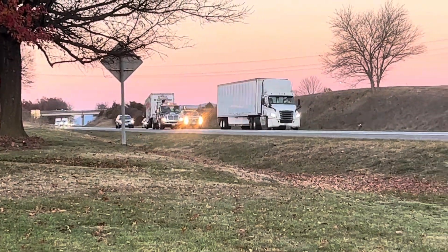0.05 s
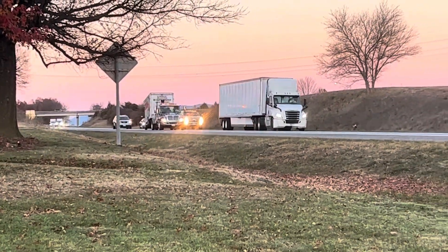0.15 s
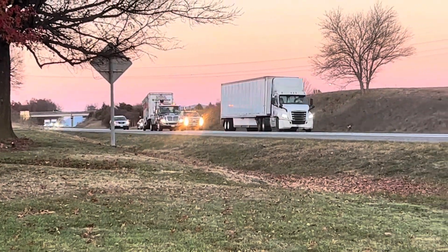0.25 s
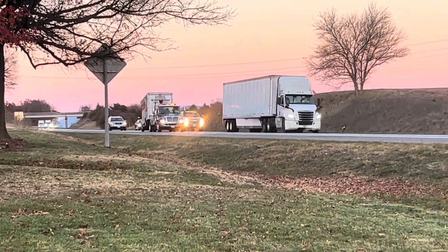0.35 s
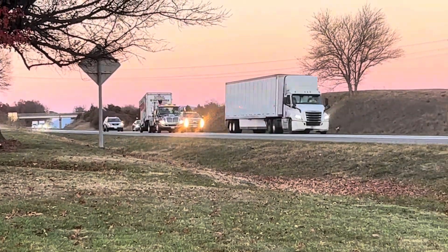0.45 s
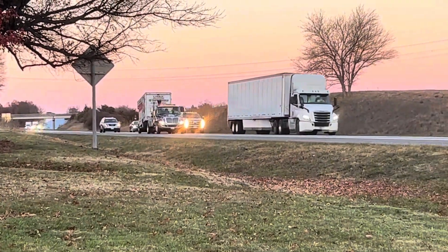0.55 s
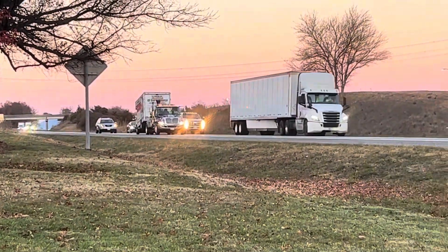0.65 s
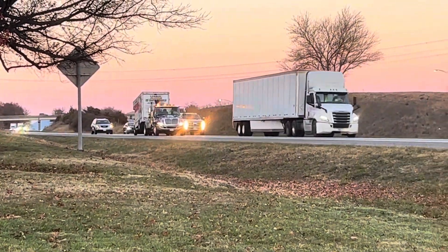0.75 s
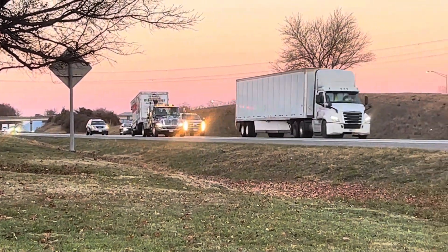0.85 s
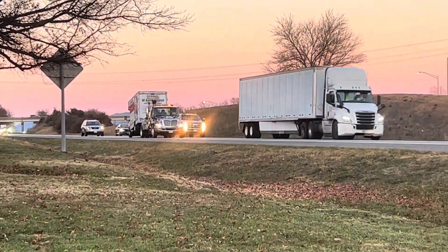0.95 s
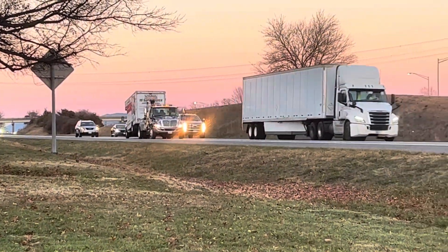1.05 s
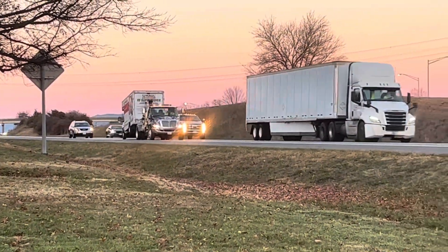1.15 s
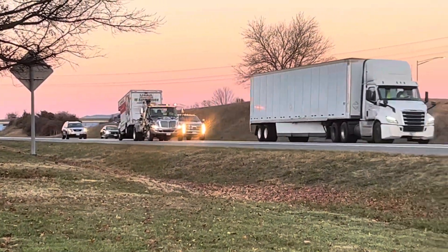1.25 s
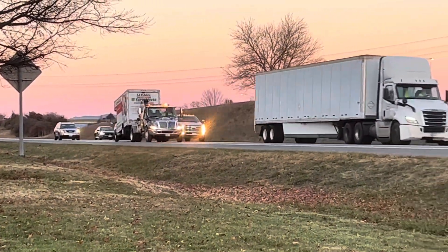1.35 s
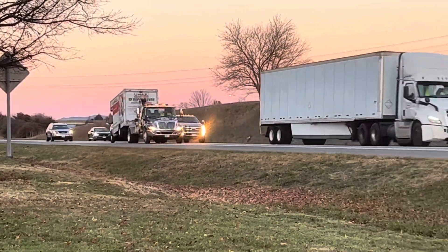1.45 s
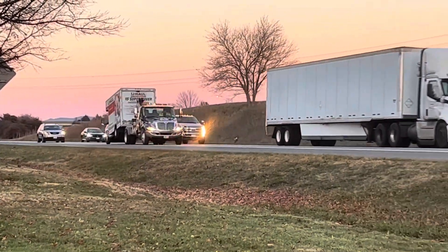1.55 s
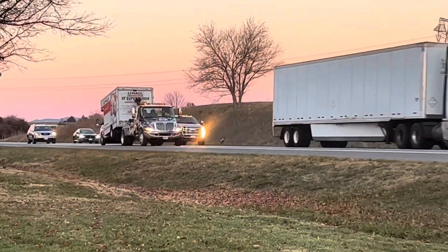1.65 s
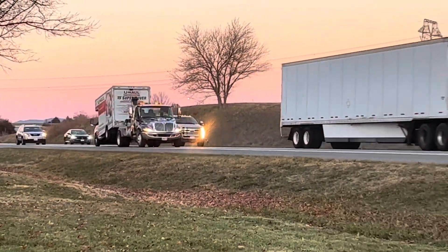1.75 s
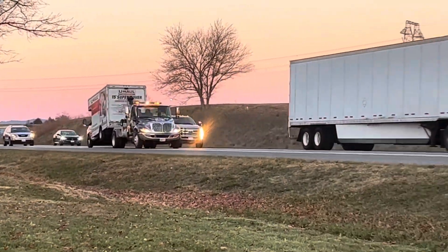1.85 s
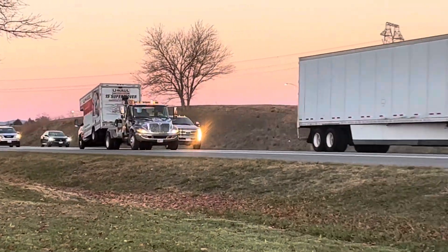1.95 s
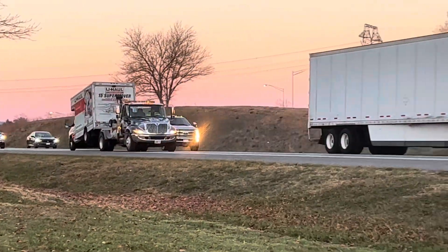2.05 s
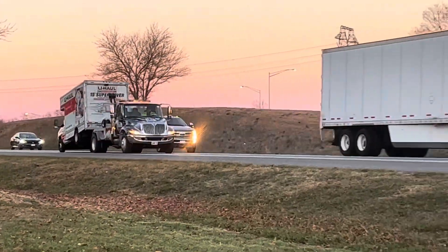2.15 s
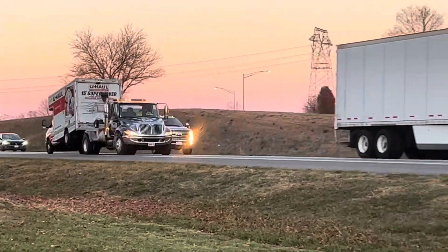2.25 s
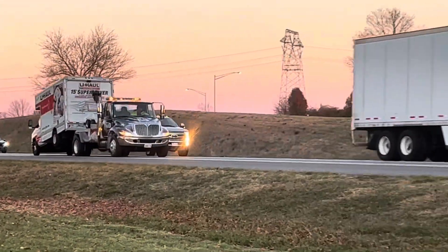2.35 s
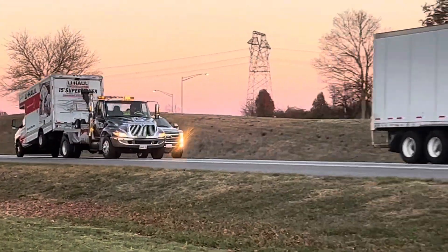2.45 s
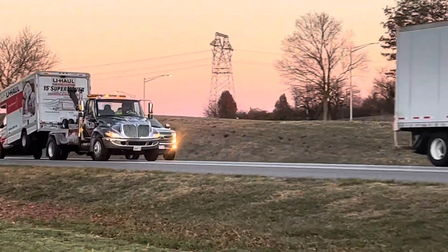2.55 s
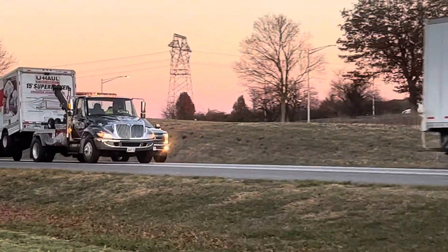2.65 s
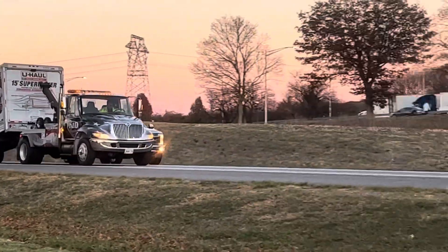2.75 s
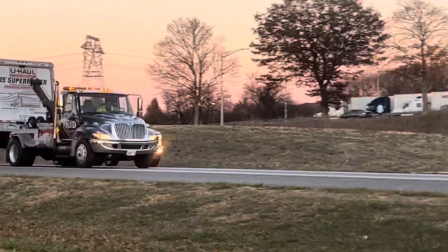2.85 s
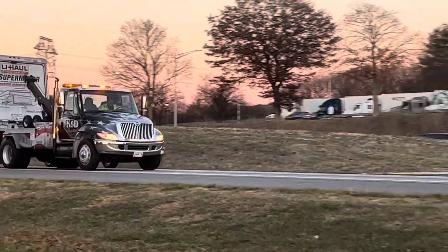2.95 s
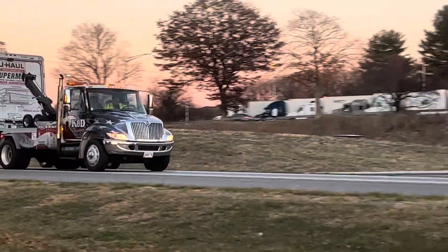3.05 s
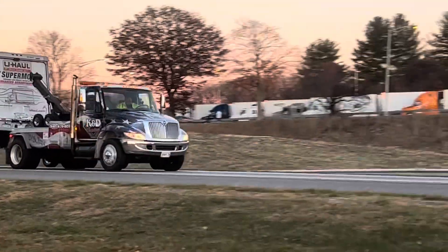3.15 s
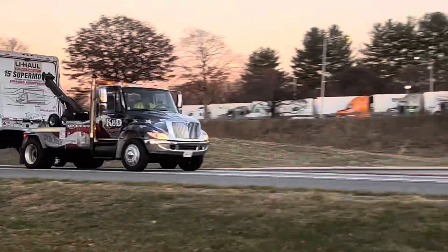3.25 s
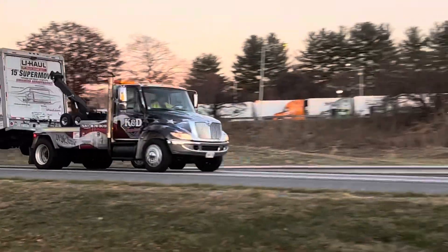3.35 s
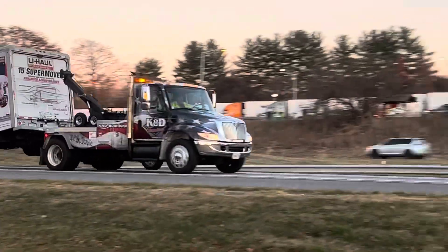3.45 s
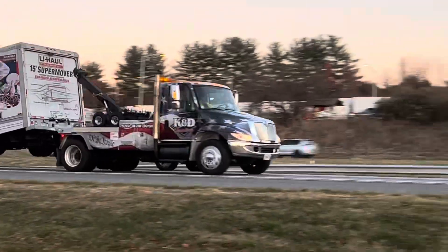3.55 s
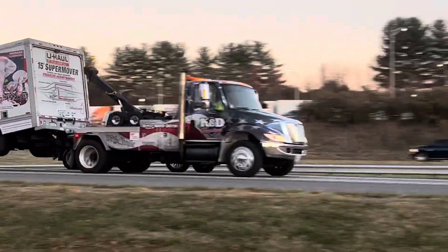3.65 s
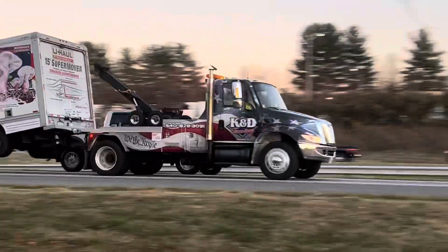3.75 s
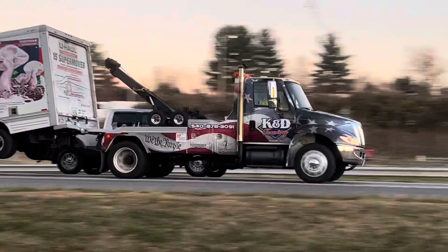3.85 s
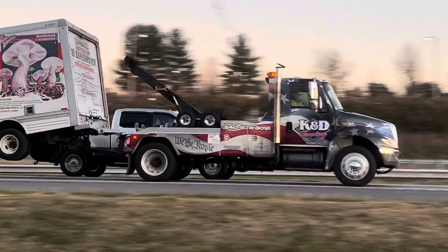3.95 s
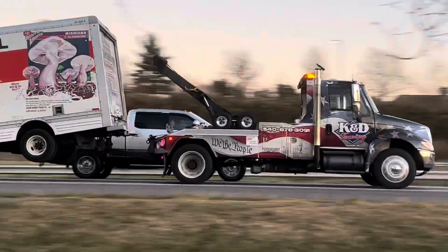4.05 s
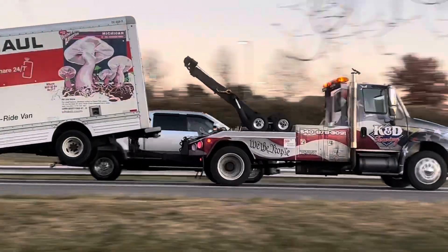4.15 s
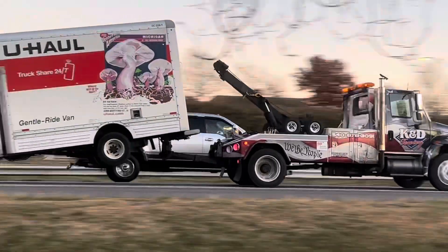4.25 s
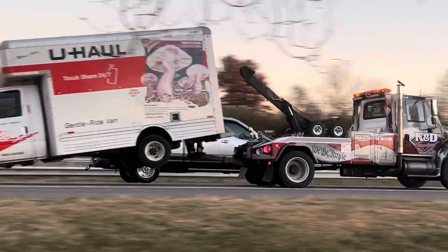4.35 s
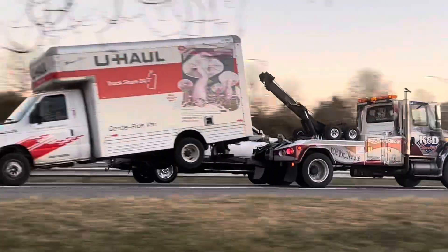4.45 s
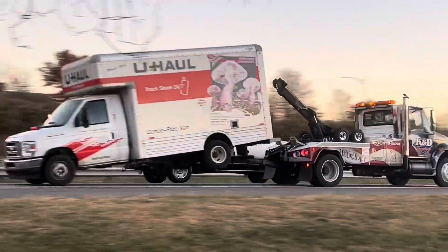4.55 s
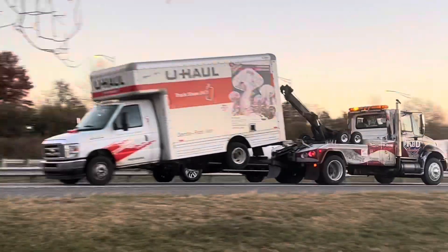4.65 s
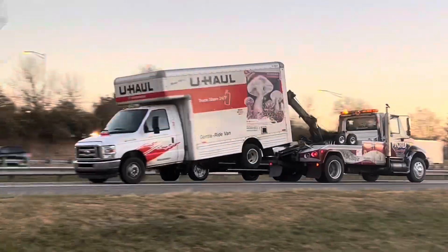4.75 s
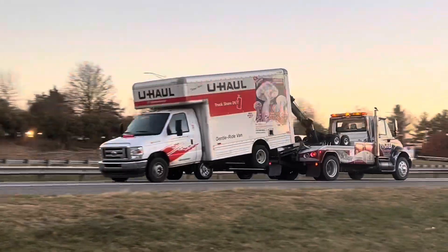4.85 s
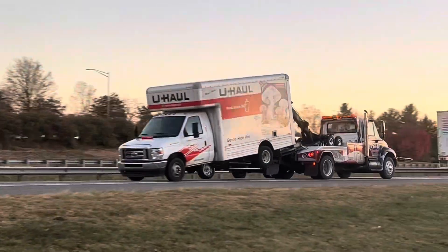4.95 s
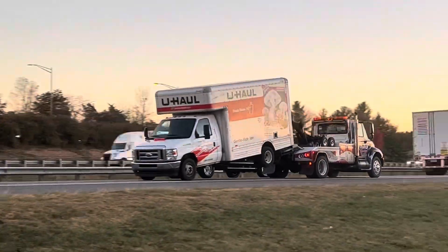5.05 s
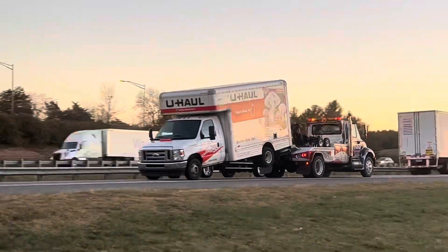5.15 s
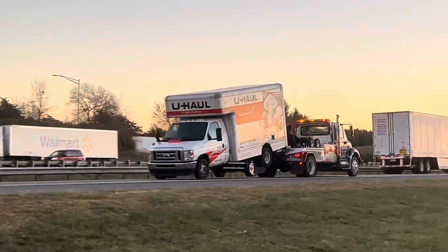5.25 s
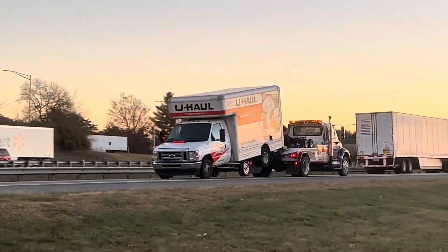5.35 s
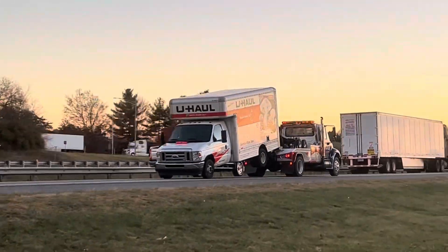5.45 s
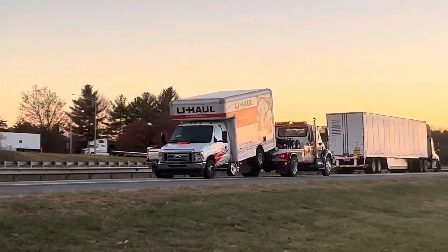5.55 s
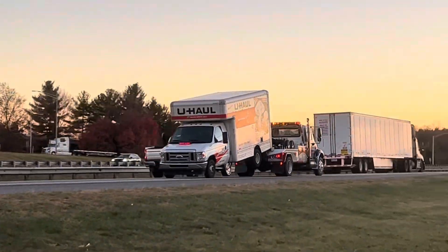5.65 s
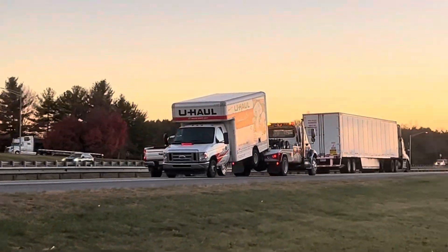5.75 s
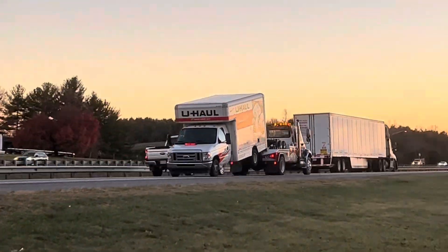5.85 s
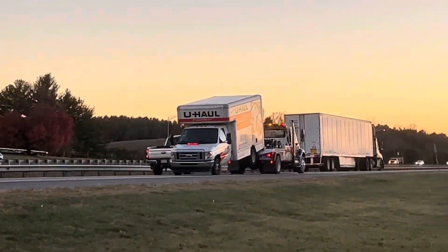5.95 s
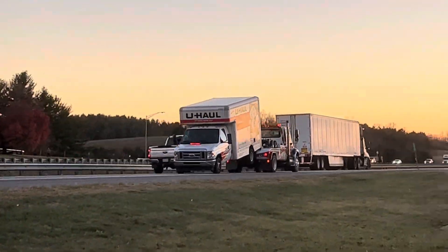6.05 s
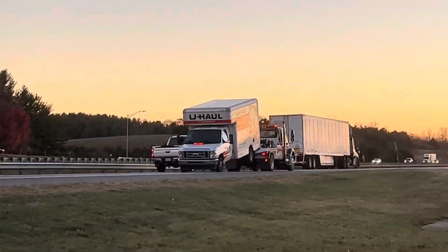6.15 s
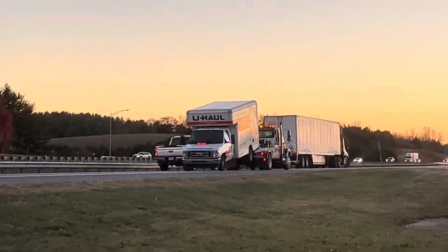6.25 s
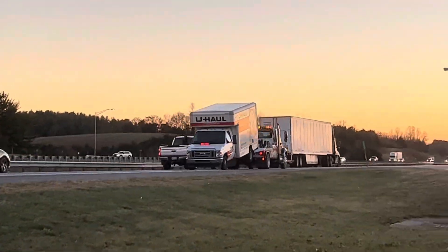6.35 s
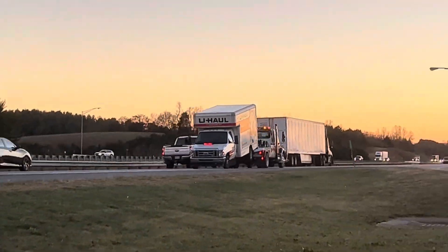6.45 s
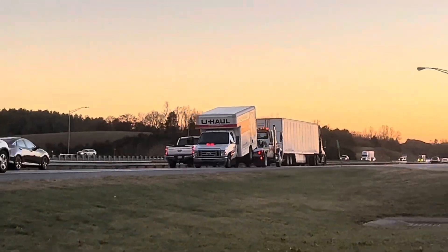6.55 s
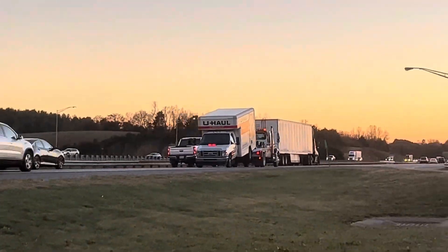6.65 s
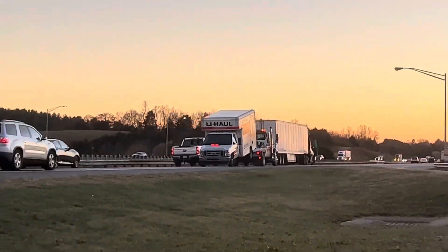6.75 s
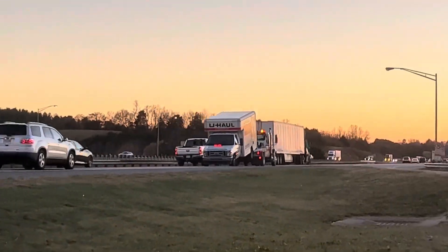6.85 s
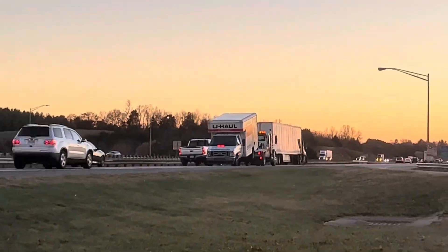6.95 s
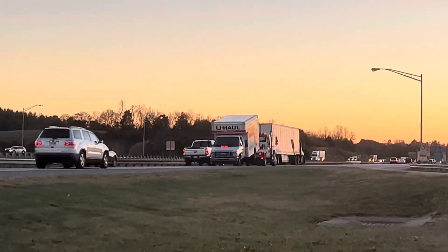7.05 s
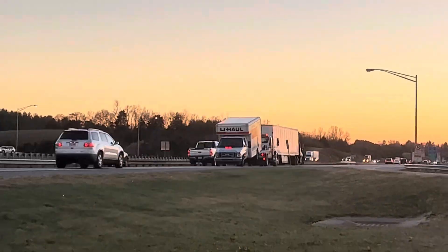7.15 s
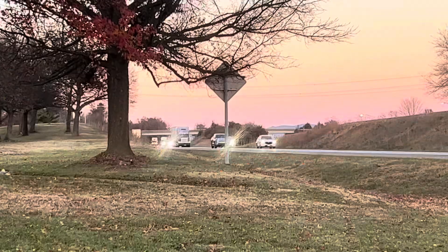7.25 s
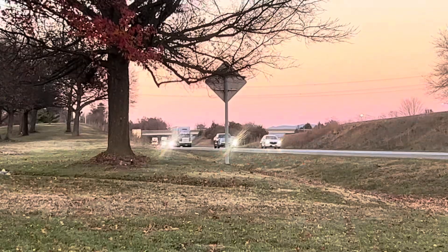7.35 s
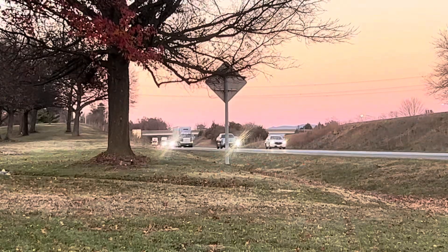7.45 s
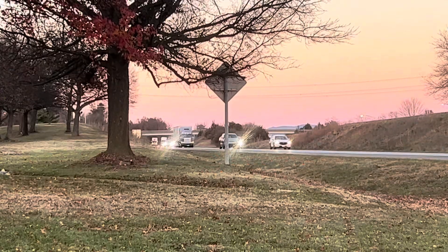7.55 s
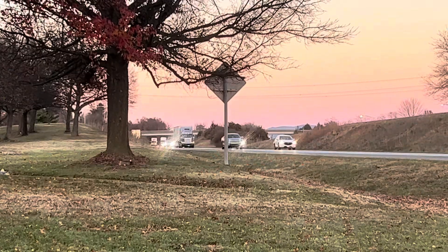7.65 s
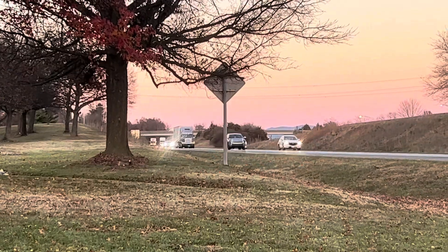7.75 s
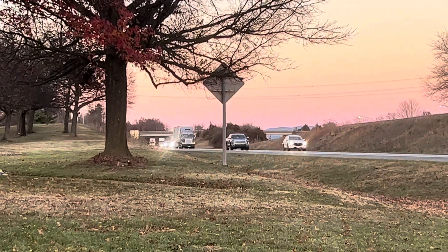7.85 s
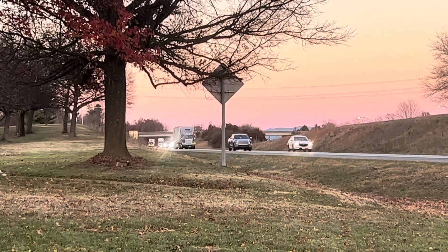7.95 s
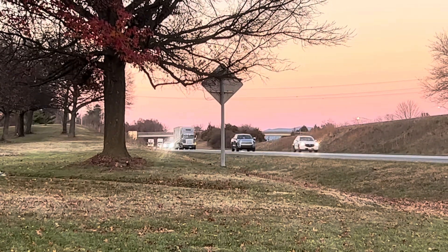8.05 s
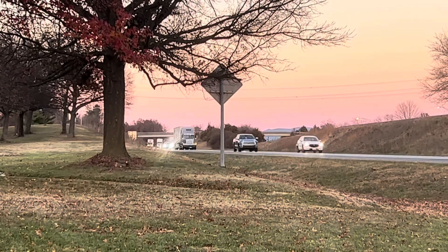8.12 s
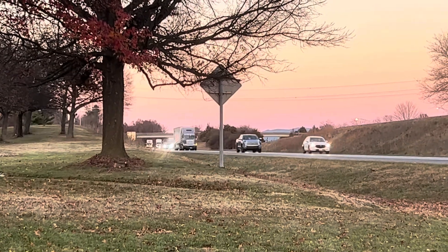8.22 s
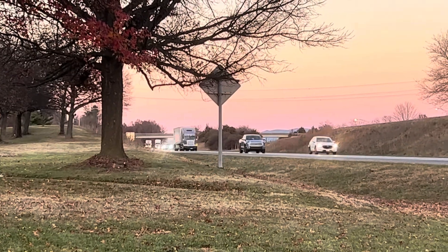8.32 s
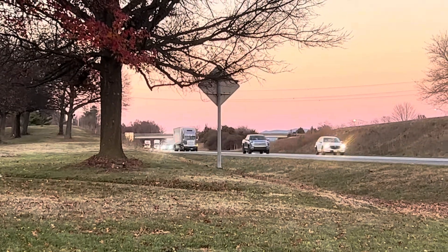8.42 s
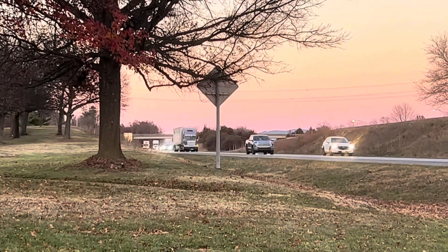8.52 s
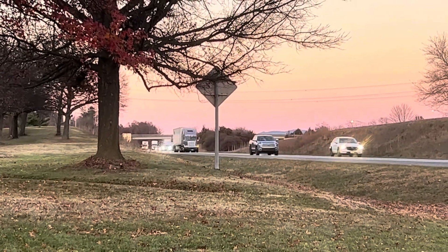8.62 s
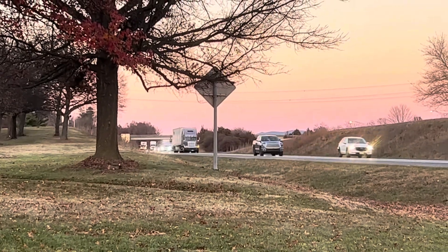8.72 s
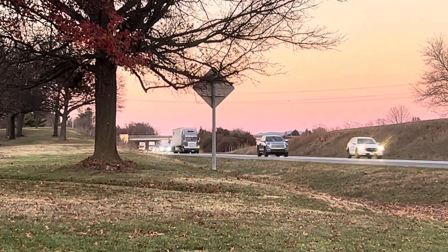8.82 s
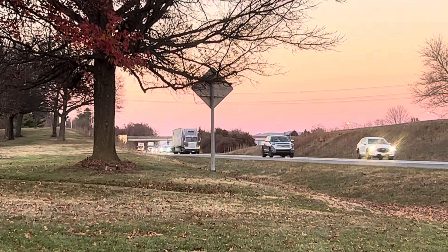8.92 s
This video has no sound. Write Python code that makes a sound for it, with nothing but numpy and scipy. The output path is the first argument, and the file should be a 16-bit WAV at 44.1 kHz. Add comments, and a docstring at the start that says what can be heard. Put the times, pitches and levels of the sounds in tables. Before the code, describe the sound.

Outdoors beside a highway, a stereo microphone on the grass verge catches a large truck approaching and roaring past, its singing tyres and diesel note gliding down. A tow truck pulling a van follows about a second later, with pulsing tyre hum, rushing air, hiss and low engine boom. The noise recedes as a smaller car passes, then cuts abruptly to a far quieter murmur of distant traffic with soft approaching tyre hum.

```python
"""A tractor-trailer passes a grass verge beside a highway, then a tow truck hauling a box van, then cars.
Filtered noise makes the rumble of the bodies and the roar, rush and hiss of the tyres.
Wavering tones make singing tyres, droning diesels and turbo whistles, gliding down as each truck goes by.
At 7.244 s the scene cuts to a lull in which the next cars are still far off."""
import sys
import numpy as np
from scipy.fft import rfft, irfft, next_fast_len
from scipy.io import wavfile
from scipy.ndimage import uniform_filter1d, map_coordinates

SR = 44100
rng = np.random.default_rng(int(sys.argv[2]) if len(sys.argv) > 2 else 0)


def digitize_waveform(pressure):
    """Quantize a signal to 16-bit integers and store it at the path in sys.argv[1].

    Rows of a 2-D input are taken as channels; values are limited to [-1, 1].
    """
    field = np.atleast_2d(pressure).T
    bounded = np.clip(field, -1, 1)
    quanta = np.round(bounded * 32767).astype(np.int16)
    wavfile.write(sys.argv[1], SR, quanta)


N = 396018
TIME = np.arange(N) / SR   # seconds
BIN_HZ = np.maximum(np.arange(N // 2 + 1) * SR / N, 1)   # frequency of each spectrum bin

CUT_S = 7.244   # when the lull takes over
SOUND_SPEED = 343   # m/s
LANE_SPEED = 30.5   # m/s, for the noise of all vehicles
REFERENCE_M = 20   # distance at which the noise levels are given
SCREENING_S = 2.4   # time for following vehicles to hide a truck
SKIRT = 1.8   # steepness of the flanks of every swell
WAVER, WAVER_RATE_HZ = 0.002966, 5.85   # typical share of pitch by which tones wander, and how fast
HISS_SURGE_SHARE = 0.71   # how much of the tyre surges the hiss follows
DRONE_DB, DRONE_HZ = -47.5, 60.4   # far diesels
FAR_ROAR_DB, FAR_PAN_DB = -37, -0.8   # far traffic; the pan is left minus right, below the treble
FAR_HISS_DB, FAR_TILT_DB = -57.5, -2   # steady hiss, and its change per octave
FAR_RUSH_DB = 7.5   # the far cars' rush, relative to their swell
CUTOFF_HZ = 15150   # top of the treble

# Rumble of exhausts and trailer panels. Each row: frequency in Hz, relative level in dB per Hz.
RUMBLE_COLOUR = [(18, -27), (30, -16), (45, -1.5), (62, 3), (85, -2), (110, -2.5), (140, -7), (220, -26)]
# Air torn up behind the trucks. Each row: frequency in Hz, relative level in dB per Hz.
WAKE_COLOUR = [(90, -12), (150, -3.5), (220, 0), (290, -3), (420, -0.5), (520, -6.5), (640, -6.5),
               (900, -24)]
# Tread blocks slapping the asphalt. Each row: frequency in Hz, relative level in dB per Hz.
TREAD_COLOUR = [(330, -25.5), (500, -12), (640, -4.5), (800, -1), (930, -0.5), (1080, -7.5), (1400, -19.5)]
# Air pumped out of the tread grooves. Each row: frequency in Hz, relative level in dB per Hz.
RUSH_COLOUR = [(700, -10.5), (1080, -2), (1350, 3), (1560, -2), (1720, 2), (1900, 1), (2150, -6),
               (2600, -22), (3800, -44)]
# Rubber peeling off the asphalt. Each row: frequency in Hz, relative level in dB per Hz.
HISS_COLOUR = [(1500, -7.5), (2300, 2.5), (3000, -1.5), (4300, -10), (5300, -12.5), (5900, -15.5),
               (6600, -15.5), (7300, -19), (8400, -20.5), (9300, -24), (10500, -18), (13000, -22),
               (15500, -25)]
# Far traffic, its low midrange soaked up by the grass. Each row: frequency in Hz, relative level in dB per Hz.
FAR_ROAR_COLOUR = [(25, -16), (60, -0.5), (110, -4.5), (170, -9), (280, -13.5), (450, -13), (640, -11),
                   (880, -7), (1200, -11), (1400, -12), (1560, -14.5), (1800, -11), (2100, -18.5),
                   (2800, -35)]
# Stereo width before each noise's own offset. Each row: frequency in Hz, side minus mid in dB.
STEREO_WIDTH = [(30, -34), (120, -23), (300, -12.5), (500, -10), (800, -7), (1150, -5.5), (1400, -6),
                (1560, -2), (1750, -12.5), (2200, -18), (2850, -26), (3400, -47), (5000, -43)]
# Unequal colour of left and right. Each row: frequency in Hz, left minus right in dB.
LEFT_RIGHT_BALANCE = [(200, 0), (400, -0.5), (690, 1.5), (1280, -1.5), (2360, -1.8), (3300, 0)]
# Phase of left behind right, by frequency. Each row: frequency in Hz, lag in cycles.
LEFT_LAG = [(350, 0), (540, .11), (720, .03), (950, -.04), (1150, .1), (1400, .04), (1750, -.06),
            (2200, -.01), (7450, 0), (7700, .11), (8900, .3), (9300, .45), (10300, .53), (11700, .81),
            (12100, .99), (13450, 1), (13800, 1.13), (15200, 1.44)]

# Path of the semi. In order: time abreast in seconds, speed in m/s, distance in m.
SEMI_PATH = (3.06, 31.4, 21.4)
# Path of its drive axles. In order: time abreast in seconds, speed in m/s, distance in m.
DRIVE_AXLE_PATH = (2.95, 33, 17)
# Path of the tow truck's tyres. In order: time abreast in seconds, speed in m/s, distance in m.
TOW_PATH = (4.08, 29.5, 20.5)
# Glide of the tow truck's turbo whistle. In order: time abreast in seconds, speed in m/s, distance in m.
TOW_TURBO_GLIDE = (4.09, 26.5, 13.9)
# Glide of the tow truck's diesel note. In order: time abreast in seconds, speed in m/s, distance in m.
TOW_DIESEL_GLIDE = (3.5, 29.5, 20.5)
# Semi, tow truck, a car, and one still approaching at the cut. Each row: time the front is abreast
# in seconds, distance in m, then relative levels of body, tyres and top hiss in dB.
VEHICLES = [(2.58, 29.8, 0, 0, -2), (3.76, 18.4, -8.5, -4, -3.5), (5.4, 22.7, -19, -11.5, -14.5),
            (8.12, 19, -7.5, -2.5, -11)]

# How each noise carries, before its small fixed trim and drift. In order: level at the reference
# distance in dB, loss per doubling of distance in dB, extra to the rear (taken off ahead) in dB,
# far traffic in dB. These columns serve the rumble, wake, tread and rush.
RUMBLE_LAW = (-23, 5.5, -0.5, -35)
WAKE_LAW = (-22, 10.5, 7, -50.5)
TREAD_LAW = (-22, 6, 5, -42.5)
RUSH_LAW = (-26, 6, 3, -36.5)
# The same for hiss around 3.2, 6.4 and 12.8 kHz. Each row: level in dB, loss per doubling of distance
# in dB, extra to the rear in dB, far traffic in dB.
HISS_LAWS = [(-32, 8.5, 5.5, -67), (-30.5, 11, 7, -72), (-30.5, 14.5, 8, -74)]
# Centre of the tread roar, smoothed later. Each row: time in seconds, pitch in Hz.
TREAD_PITCH = [(0, 901.5), (1.8, 751.4), (2.4, 797), (3.4, 800.6), (4.5, 735.7), (5.8, 838.7), (7.24, 890)]
# The tyre noise shifts between left and right. Each row: time in seconds, left minus right in dB.
TYRE_PAN = [(0, -4), (1.9, 0.1), (4.2, 1), (4.9, -1.5), (5.9, 1.1)]
# Tyre rush and hiss dip and surge. Each row: time in seconds, change in dB, half width in seconds.
TYRE_SURGES = [(.93, 2.5, 0.057), (1.68, -2, 0.17), (1.93, 2, 0.055), (2.28, 1.5, 0.12), (2.75, 0.8, 0.14),
               (3.58, 1.6, 0.18), (4.14, -1.9, 0.17), (4.85, 1.3, .17), (5.55, -1.5, .2), (6.1, 0.5, .15)]
# Wake gusts behind the trailer, then eases. Each row: time in seconds, change in dB, half width in seconds.
WAKE_SURGES = [(3.25, 2, 0.32), (3.88, -1.5, .12)]
# Rumble sags and wells up. Each row: time in seconds, change in dB, half width in seconds.
RUMBLE_SURGES = [(.4, -3, 0.054), (1.3, -4, 0.27), (1.88, 0.5, 0.065), (2.12, -1.5, .12), (5.4, -2, .5),
                 (6.5, -0.5, 0.12), (6.78, -3.5, .08)]
# Tread roar does so too. Each row: time in seconds, change in dB, half width in seconds.
TREAD_SURGES = [(2.3, 2, 0.089), (3.08, -3.5, 0.075), (3.45, 0, .06), (4.4, -2, 0.15), (4.74, -1.5, 0.13),
                (5.02, 0.5, 0.046)]

# Semi's tyres beam ahead and behind. Each row: loudest time in seconds, level in dB, half width in seconds.
SEMI_WHINE = [(1.7, -36.5, 0.5), (2.22, -24, 0.18), (2.72, -21, 0.19), (3.05, -31.5, 0.15),
              (3.7, -34, 0.27), (4.25, -31.5, 0.66), (5.2, -40.5, 0.6), (7.05, -41.5, 0.41)]
# Howl of its drive axles. Each row: loudest time in seconds, level in dB, half width in seconds.
SEMI_DRIVE_TYRES = [(1.55, -37, .15), (1.9, -31, .16), (2.6, -36, .25), (3.08, -27, .14), (3.36, -27, .13),
                    (3.9, -35.5, .17), (5.3, -43, .5)]
# Second axle, a little lower. Each row: loudest time in seconds, level in dB, half width in seconds.
SEMI_SECOND_AXLE = [(.35, -44.5, 0.58), (1.2, -40, 0.39), (2.2, -39, 0.71)]
# Its ringing tread grooves. Each row: loudest time in seconds, level in dB, half width in seconds.
SEMI_GROOVES = [(2.9, -30, 1.38)]
# Its diesel's firing note. Each row: loudest time in seconds, level in dB, half width in seconds.
SEMI_DIESEL = [(1.35, -36, 0.64), (2.72, -29, 0.13), (3.1, -31, 0.11), (3.55, -29.5, .25),
               (4.45, -37, 0.43)]
# Its exhaust note. Each row: loudest time in seconds, level in dB, half width in seconds.
SEMI_EXHAUST = [(1.4, -40, 0.54), (2.85, -30.5, .35), (3.5, -30.5, 0.27)]
# Its turbo. Each row: loudest time in seconds, level in dB, half width in seconds.
SEMI_TURBO = [(1.3, -65, 0.45), (2.0, -59.5, .35), (2.56, -54.5, .2)]
# Tow truck's tyre hum. Each row: loudest time in seconds, level in dB, half width in seconds.
TOW_WHINE = [(3.15, -40, 0.11), (3.39, -25.5, 0.087), (3.74, -22.5, 0.076), (4.09, -25.5, 0.08),
             (4.42, -22.5, 0.16), (4.64, -25, 0.09), (5.15, -37.5, 0.44), (6.1, -41, 0.51)]
# Second axle, a little lower. Each row: loudest time in seconds, level in dB, half width in seconds.
TOW_SECOND_AXLE = [(3.58, -31.5, 0.33)]
# Its ringing tread grooves. Each row: loudest time in seconds, level in dB, half width in seconds.
TOW_GROOVES = [(4.93, -34.5, 0.55)]
# Its diesel. Each row: loudest time in seconds, level in dB, half width in seconds.
TOW_DIESEL = [(4.3, -38.5, 0.54), (5.4, -44.5, 0.42)]
# Its engine's low boom. Each row: loudest time in seconds, level in dB, half width in seconds.
TOW_BOOM = [(4.4, -31.5, 0.24), (4.9, -33.5, .25)]
# Its turbo whistle. Each row: loudest time in seconds, level in dB, half width in seconds.
TOW_TURBO = [(3.55, -62, .22), (4.1, -58, .33), (4.85, -62, .38)]
# The towed van's note. Each row: loudest time in seconds, level in dB, half width in seconds.
VAN_WHINE = [(3.69, -28.5, .11), (4.55, -40, 0.27)]
# A pickup alongside. Each row: loudest time in seconds, level in dB, half width in seconds.
PICKUP_WHINE = [(4.85, -37.5, .22)]
# Brief bass throbs. Each row: loudest time in seconds, level in dB, half width in seconds, pitch in Hz.
THROBS = [(.14, -37, 0.11, 61.8), (.53, -26.5, .07, 61.9), (.98, -34, .12, 60), (1.95, -35.5, .08, 194.6),
          (2.17, -25, 0.1, 61.8), (3.6, -30, 0.12, 205.6), (4.3, -28, 0.11, 55.8), (4.74, -26, .035, 58),
          (4.89, -24.5, .04, 57.2), (5.28, -24, 0.056, 63.2), (7.1, -35.5, 0.26, 62)]

# Hum of approaching car tyres. Each row: loudest time in seconds, level in dB, half width in seconds.
CAR_WHINE = [(6.1, -38, .55), (7.15, -46, 0.42), (7.76, -41, 0.19), (8.17, -42, 0.24)]
# Its pitch. Each row: time in seconds, pitch in Hz.
CAR_WHINE_PITCH = [(5.4, 850), (6.3, 895), (7.2, 975), (7.7, 967), (8.3, 1018)]
# A car engine in the lull. Each row: loudest time in seconds, level in dB, half width in seconds.
CAR_ENGINE = [(8.94, -52.5, .9)]
# Far cars hiss in turn. Each row: loudest time in seconds, level in dB, half width in seconds.
FAR_CARS = [(7.29, -53.5, 0.19), (7.78, -54, 0.12), (8.3, -51.5, 0.35)]
# A far truck's rumble comes nearer. Each row: loudest time in seconds, level in dB, half width in seconds.
FAR_TRUCK = [(8.95, -47, .22)]
# Its tyres start to howl. Each row: loudest time in seconds, level in dB, half width in seconds.
FAR_TRUCK_TYRES = [(8.72, -45.5, .2)]


def from_db(db):
    """Decibels to gain."""
    return 10 ** (np.asarray(db) / 20)


def rms_one(x):
    """Scale to unit power."""
    return x / np.sqrt(np.mean(x ** 2) + 1e-20)


def curve(points):
    """A table of time and value, read at every sample."""
    return np.interp(TIME, *np.transpose(points))


def over_hz(points):
    """A table of frequency and value, read at every bin on a logarithmic scale."""
    hz, value = np.transpose(points)
    return np.interp(np.log(BIN_HZ), np.log(hz), value)


def lobe(s, width_s):
    """A bell of height 1 in time."""
    return (1 + ((TIME - s) / width_s) ** 2 / SKIRT) ** -SKIRT


def swell(lobes):
    """Gain of a source that swells and fades; its lobes add in power."""
    return np.sqrt(sum((from_db(db) * lobe(s, width_s)) ** 2 for s, db, width_s in lobes))


def surge_db(surges):
    """Brief rises and dips of a level."""
    return sum(db * lobe(s, width_s) for s, db, width_s in surges)


def drift(rate_hz):
    """Slow chance with spread 1: noise kept only below about the given rate."""
    step = 16   # drawn once per 16 samples, then joined by straight lines
    size = next_fast_len(N // step + 2)
    hz = np.arange(size // 2 + 1) * SR / step / size
    slow = irfft(rfft(rng.standard_normal(size)) / (1 + (hz / rate_hz) ** 4), size)
    return np.interp(np.arange(N) / step, np.arange(size), rms_one(slow))


def colour(points):
    """Gain per bin of a spectrum, with steep skirts beyond its ends."""
    octaves_below = np.maximum(np.log2(points[0][0] / BIN_HZ), 0)
    octaves_above = np.maximum(np.log2(BIN_HZ / points[-1][0]), 0)
    return from_db(over_hz(points) - 67 * (octaves_below + octaves_above))


def stereo_noise(gain, width_db):
    """Coloured noise whose middle has rms 1; wide in the midrange, narrow in bass and treble."""
    mid, side = rfft(rng.standard_normal((2, N))) * gain
    mid = irfft(mid, N)
    side = irfft(side * from_db(over_hz(STEREO_WIDTH) + width_db), N)
    return (mid + side * np.array([[1], [-1]])) / np.std(mid)


def panned(x, pan_db):
    """Only the sound below the treble leans to one side; the treble stays in the centre."""
    lower = irfft(rfft(x) / (1 + (BIN_HZ / 2900) ** 8), N)
    return x - lower + lower * from_db(pan_db * np.array([[.5], [-.5]]))


def tone(hz, scatter, width_hz, side_db):
    """A clean line plus a scattered share, from unequal tread blocks and many paths over the ground."""
    scatter = np.clip(scatter, 0, 1)
    wavering_hz = hz * (1 + WAVER * drift(WAVER_RATE_HZ))
    turn = np.exp(2j * np.pi * np.cumsum(wavering_hz) / SR)
    mid = np.sqrt(2 * (1 - scatter)) + np.sqrt(scatter) * (drift(width_hz) + 1j * drift(width_hz))
    side = from_db(side_db) * (drift(width_hz) + 1j * drift(width_hz))
    return np.real(turn * (mid + side * np.array([[1], [-1]])))


def doppler(abreast_s, speed, distance):
    """Pitch ratio of a vehicle on a straight lane: above 1 coming, below 1 going."""
    along = speed * (TIME - abreast_s)
    return 1 / (1 + speed / SOUND_SPEED * along / np.hypot(along, distance))


def scattered(abreast_s, clear, behind):
    """Scattered share of a truck's whine: once it is past, following vehicles break up the direct path."""
    return clear + behind * np.clip((TIME - abreast_s) / SCREENING_S, 0, 1)


def passing_db(law, part):
    """Level of one noise, summed over the vehicles: it falls with distance and may differ ahead and behind."""
    level_db, doubling_db, rear_db, far_db = law
    seconds = np.linspace(0, TIME[-1], 500)
    power = from_db(far_db) ** 2
    for abreast_s, distance, body_db, tyres_db, top_db in VEHICLES:
        along = LANE_SPEED * (seconds - abreast_s)
        away = np.hypot(along, distance)
        own_db = {"body": body_db, "tyres": tyres_db, "top": top_db}[part]
        spreading_db = doubling_db * np.log2(away / REFERENCE_M)
        facing_db = rear_db * along / away
        power = power + from_db(level_db + own_db - spreading_db + facing_db) ** 2
    return np.interp(TIME, seconds, 10 * np.log10(power))


def far_drone():
    """Far diesels drone on one low note, which swells as a far truck comes nearer."""
    level = from_db(DRONE_DB) + swell(FAR_TRUCK)
    return level * tone(DRONE_HZ, scatter=.25, width_hz=5, side_db=-25)


def car_tyre_hum():
    """Tyres of approaching cars hum as a blurred tone that mostly rises."""
    return swell(CAR_WHINE) * tone(curve(CAR_WHINE_PITCH), scatter=1, width_hz=48, side_db=-4)


def tyre_air(rush_db):
    """Air pumped out of the tread grooves rushes."""
    return from_db(rush_db - 0.94 + .5 * drift(16.0)) * stereo_noise(colour(RUSH_COLOUR), width_db=5.0)


def tyre_hiss(octaves_db):
    """Rubber peels off the asphalt with a hiss, in three overlapping bands with levels of their own."""
    hiss = rfft(stereo_noise(colour(HISS_COLOUR), width_db=-26))
    octave = np.clip(np.log2(BIN_HZ / 3200), 0, 2)
    bands = [irfft(hiss * np.maximum(1 - abs(octave - k), 0), N) for k in range(3)]
    tilted = sum(from_db(db + 0.71 * drift(14)) * band for db, band in zip(octaves_db, bands))
    return from_db(2.0 + 0.22 * drift(9)) * tilted


def lull():
    """Far traffic murmurs; approaching cars rush and hiss in turn, an engine sinks and a truck's tyres howl."""
    roar = from_db(FAR_ROAR_DB + 1.13 * drift(9.5)) * stereo_noise(colour(FAR_ROAR_COLOUR), width_db=7.0)
    cars = swell(FAR_CARS)
    hiss_db = 20 * np.log10(np.hypot(from_db(FAR_HISS_DB), cars))
    hiss = tyre_hiss([hiss_db + k * FAR_TILT_DB for k in range(3)])
    grooves = from_db(-5.0) * tone(1860, scatter=0.96, width_hz=140, side_db=-6)
    rush = cars * from_db(FAR_RUSH_DB) * (tyre_air(-2) + grooves)
    engine_hz = np.interp(TIME, [7.6, 8.98], [168, 138])
    engine = swell(CAR_ENGINE) * tone(engine_hz, scatter=0.28, width_hz=4.6, side_db=-11)
    truck_tyres = swell(FAR_TRUCK_TYRES) * tone(785, scatter=0.88, width_hz=40, side_db=0)
    return panned(roar + rush + hiss, FAR_PAN_DB) + engine + truck_tyres


def body_noise(rumble_db, wake_db):
    """Exhausts and trailer panels rumble; the air torn up behind the trucks roars above them."""
    rumble = from_db(rumble_db - 1.0 + 1.56 * drift(5.9)) * stereo_noise(colour(RUMBLE_COLOUR), width_db=4.5)
    wake = from_db(wake_db + 2.0 + 0.5 * drift(6.3)) * stereo_noise(colour(WAKE_COLOUR), width_db=0.5)
    return rumble + wake


def tread_roar(tread_db, tread_hz):
    """Tread blocks slap the asphalt; playing their noise faster or slower moves its hump in pitch."""
    glide = uniform_filter1d(tread_hz, SR // 3) / 830   # the unmoved hump lies near 830 Hz
    position = np.cumsum(np.clip(glide, .7, 1.4)) % (N - 1)
    roar = stereo_noise(colour(TREAD_COLOUR), width_db=0.0)
    moved = np.array([map_coordinates(channel, [position], order=3) for channel in roar])
    return from_db(tread_db + .5 * drift(10.0)) * moved


def throbs():
    """The bass wells up briefly now and then, as short nearly pure tones."""
    return sum(swell([(s, db, width_s)]) * tone(hz, scatter=0.1, width_hz=8.6, side_db=-35)
               for s, db, width_s, hz in THROBS)


def tow_truck():
    """Its tyres hum in pulses, the towed van and a pickup add notes, the engine booms and its turbo whistles."""
    shift = doppler(*TOW_PATH)
    whine_scatter = scattered(TOW_PATH[0], clear=.07, behind=.8)
    whine = tone(384.4 * shift, scatter=whine_scatter, width_hz=9, side_db=-18)
    second_axle = tone(361 * shift, scatter=.2, width_hz=10, side_db=-12)
    grooves = tone(1820 * shift, scatter=1, width_hz=115, side_db=-5)
    tyres = swell(TOW_WHINE) * whine + swell(TOW_SECOND_AXLE) * second_axle + swell(TOW_GROOVES) * grooves

    van = tone(472 * shift, scatter=.3, width_hz=14, side_db=-14)
    van_overtone = from_db(-2.0) * tone(2 * 472 * shift, scatter=.35, width_hz=14, side_db=-8)
    pickup = tone(406 * shift, scatter=.2, width_hz=8, side_db=-14)
    companions = swell(VAN_WHINE) * (van + van_overtone) + swell(PICKUP_WHINE) * pickup

    firing_hz = 176 * doppler(*TOW_DIESEL_GLIDE)
    firing = tone(firing_hz, scatter=0.15, width_hz=2.7, side_db=-17.5)
    lower_note = tone(firing_hz * 2 / 3, scatter=.4, width_hz=5, side_db=-22)
    boom = tone(firing_hz / 3, scatter=.25, width_hz=9, side_db=-28)
    turbo = tone(13850 * doppler(*TOW_TURBO_GLIDE), scatter=1, width_hz=120, side_db=-12)
    diesel = swell(TOW_DIESEL) * (firing + lower_note)
    return tyres + companions + diesel + swell(TOW_BOOM) * boom + swell(TOW_TURBO) * turbo


def semi():
    """Ribbed trailer tyres sing, two drive axles howl higher and rougher, over the diesel's firing note."""
    shift, drive_shift = doppler(*SEMI_PATH), doppler(*DRIVE_AXLE_PATH)
    whine_scatter = scattered(SEMI_PATH[0], clear=.04, behind=.5)
    whine = tone(367 * shift, scatter=whine_scatter, width_hz=8, side_db=-24)
    overtone = from_db(-10.5) * tone(2 * 367 * shift, scatter=0.38, width_hz=14, side_db=-7.5)
    drive = tone(625 * drive_shift, scatter=.2, width_hz=14, side_db=-9)
    second_axle = tone(606 * drive_shift, scatter=.95, width_hz=17, side_db=-6)
    axles = swell(SEMI_DRIVE_TYRES) * drive + swell(SEMI_SECOND_AXLE) * second_axle
    # tread grooves ring as short pipes
    grooves = swell(SEMI_GROOVES) * tone(1180 * shift, scatter=0.98, width_hz=190, side_db=-13.5)
    tyres = swell(SEMI_WHINE) * (whine + overtone) + axles + grooves

    firing = tone(71.3 * shift, scatter=0.067, width_hz=3, side_db=-26)
    exhaust = tone(105 * shift, scatter=0.77, width_hz=16, side_db=-23)
    turbo = tone(6650 * shift, scatter=1, width_hz=560, side_db=-35)
    return tyres + swell(SEMI_DIESEL) * firing + swell(SEMI_EXHAUST) * exhaust + swell(SEMI_TURBO) * turbo


def convoy():
    """The noise and the tones of the vehicles passing close by; distance takes the top hiss away first."""
    tyre_surge_db = surge_db(TYRE_SURGES)
    rumble_db = passing_db(RUMBLE_LAW, "body") + surge_db(RUMBLE_SURGES)
    wake_db = passing_db(WAKE_LAW, "body") + surge_db(WAKE_SURGES)
    body = body_noise(rumble_db, wake_db)
    tread_db = passing_db(TREAD_LAW, "tyres") + 0.36 * tyre_surge_db + surge_db(TREAD_SURGES)
    tread = tread_roar(tread_db, curve(TREAD_PITCH))
    air = tyre_air(passing_db(RUSH_LAW, "tyres") + tyre_surge_db)
    hiss = tyre_hiss([passing_db(law, part) + HISS_SURGE_SHARE * tyre_surge_db
                      for law, part in zip(HISS_LAWS, ("tyres", "tyres", "top"))])
    return body + panned(tread + air + hiss, curve(TYRE_PAN)) + semi() + tow_truck() + throbs()


def scene():
    """The convoy gives way to the lull; car tyres hum and far diesels drone on both sides of the cut."""
    after = np.clip((TIME - CUT_S) / .004 + .5, 0, 1)   # a 4 ms crossfade
    return (1 - after) * convoy() + after * lull() + car_tyre_hum() + far_drone()


def record(dry):
    """Left and right differ in colour and in phase; the top is cut."""
    fade = np.clip(np.minimum(TIME, TIME[-1] - TIME) / .004, 0, 1)   # 4 ms at each end
    left, right = rfft(dry * fade) * from_db(over_hz(LEFT_RIGHT_BALANCE) * np.array([[.5], [-.5]]))
    lag_cycles = np.interp(BIN_HZ, *np.transpose(LEFT_LAG))
    lagging_left = left * np.exp(-2j * np.pi * lag_cycles)
    low_pass = 1 / np.sqrt(1 + (BIN_HZ / CUTOFF_HZ) ** 160)
    return irfft(np.array([lagging_left, right]) * low_pass, N)


dry = scene()
out = record(dry)
digitize_waveform(out)
```